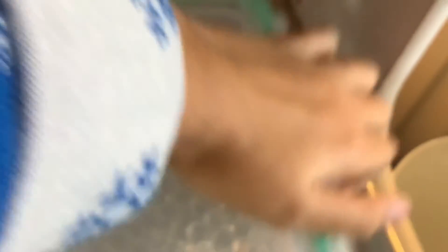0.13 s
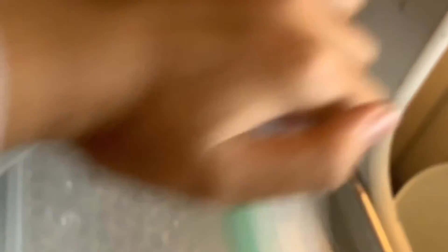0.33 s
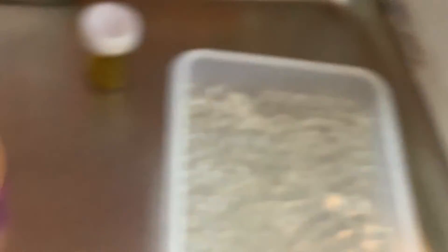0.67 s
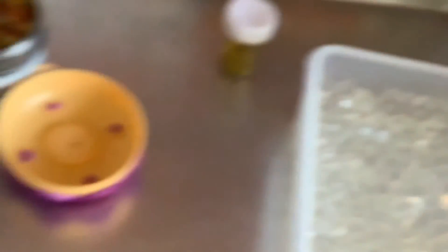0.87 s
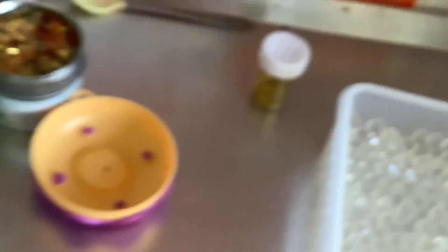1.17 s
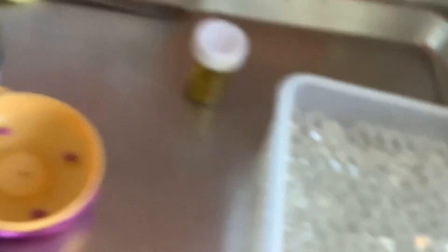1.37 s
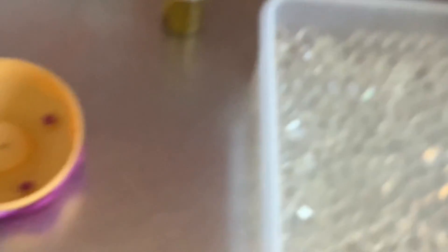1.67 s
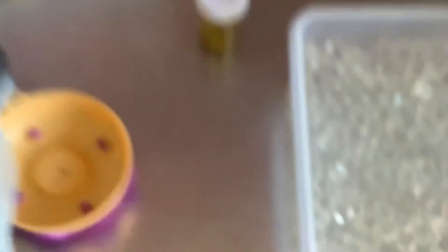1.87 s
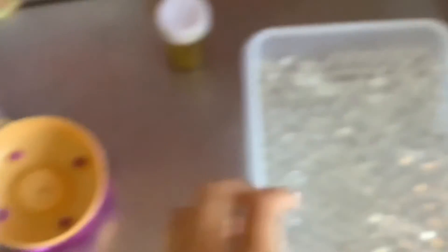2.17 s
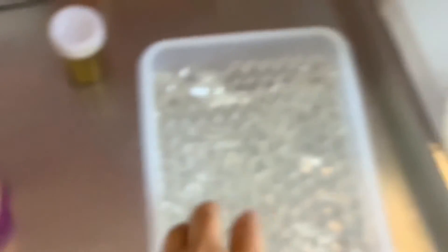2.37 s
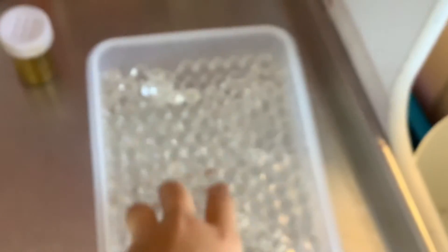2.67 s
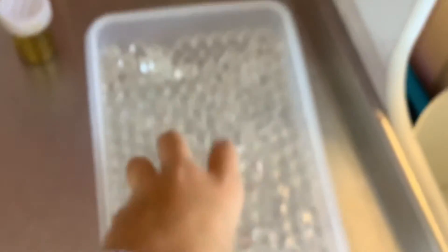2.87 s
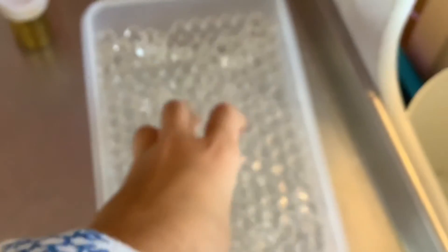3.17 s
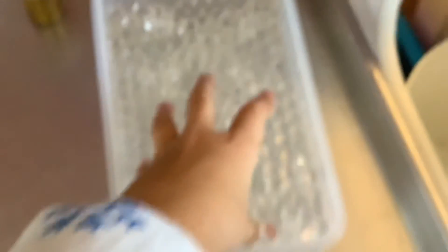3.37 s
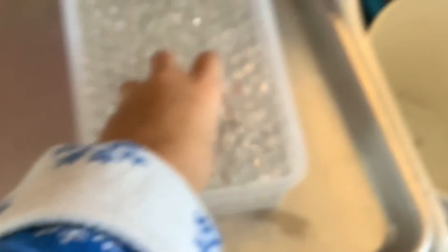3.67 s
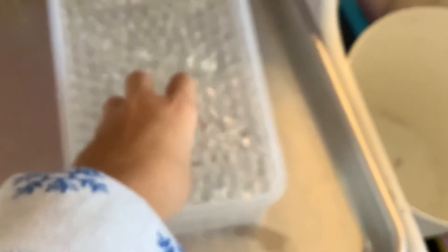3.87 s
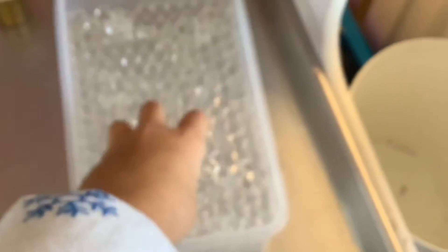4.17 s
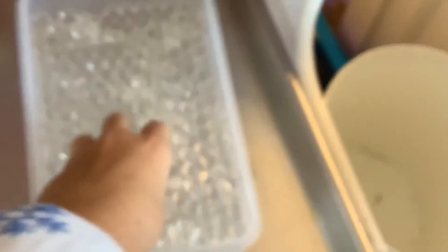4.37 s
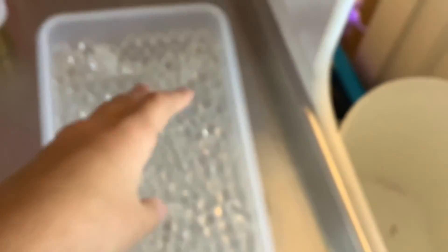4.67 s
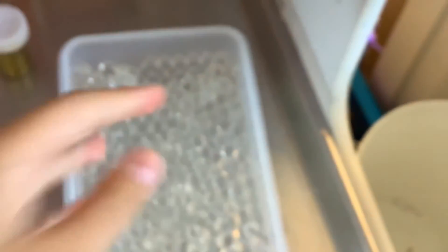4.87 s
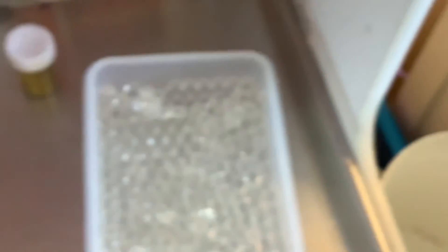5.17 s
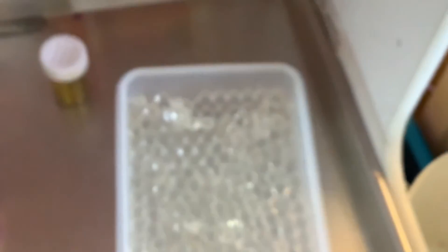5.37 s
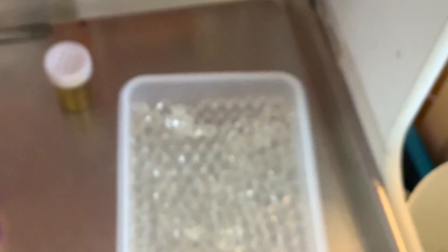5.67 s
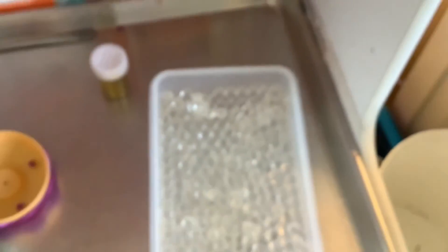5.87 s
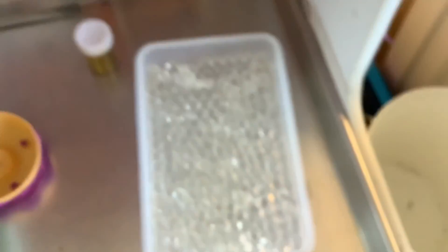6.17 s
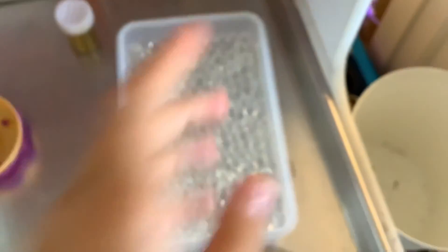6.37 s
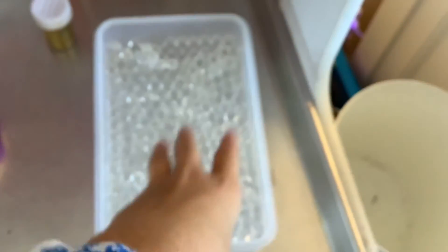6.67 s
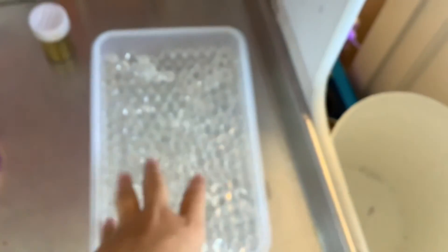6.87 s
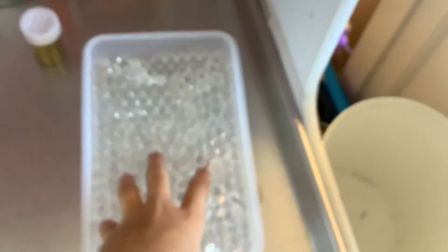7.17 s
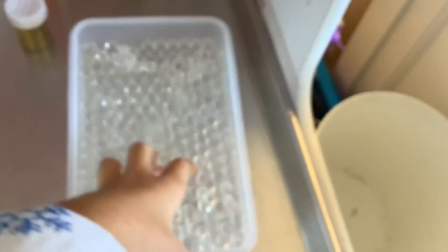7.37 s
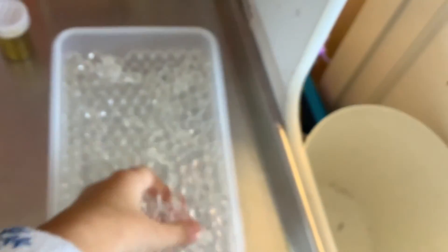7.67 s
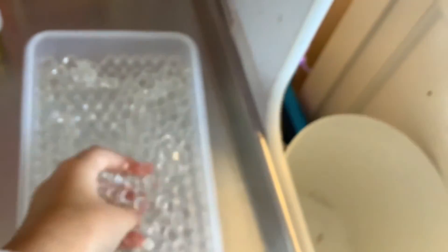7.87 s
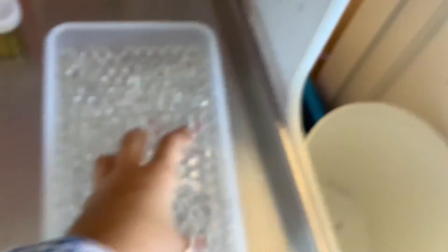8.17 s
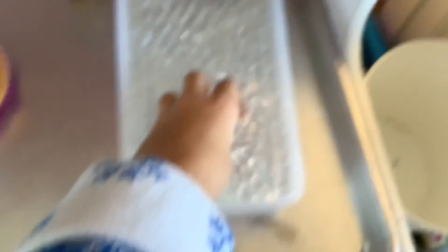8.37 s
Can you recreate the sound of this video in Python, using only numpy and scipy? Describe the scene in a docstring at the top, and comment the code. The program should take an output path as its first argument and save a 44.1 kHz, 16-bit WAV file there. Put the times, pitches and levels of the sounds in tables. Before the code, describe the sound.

Hollow plastic knocks and a sharp clatter on metal give way to quiet, low rubbery bead murmurs, wet clicks and a few dull handling thumps.

```python
"""Fingers press into a tub of wet gel beads, which rub with a low rubbery murmur, soft pats and wet clicks.
Before that a hand shoves a lidded plastic tub over a steel counter and light plastic clatters down.
Blows ring decaying modes, friction shapes random impulses, and single beads ring as rising sines.
Fingers bump the handheld phone with short falling chirps; a sleeve, the skin and the case add filtered rubs.
The camera ticks faintly once a frame over the hiss and rumble of a small quiet room."""
import sys
import numpy as np
from scipy import signal
from scipy.fft import rfft, irfft
from scipy.io import wavfile
from scipy.ndimage import uniform_filter1d

SR = 44100
rng = np.random.default_rng(int(sys.argv[2]) if len(sys.argv) > 2 else 0)


def transcribe(u):
    """Save the signal u as a 16-bit wav file named by the first command-line argument.

    u: samples, shape (n,) or (channels, n), limited to [-1, 1]; the rate is SR.
    q: integer samples, one column per channel.
    """
    v = np.clip(np.atleast_2d(u).T, -1, 1)
    q = np.round(v * 32767).astype(np.int16)
    wavfile.write(sys.argv[1], SR, q)


N = 375732
TIME = np.arange(N) / SR
HIT_SIZE = 16384  # longest single hit, in samples
AGE = TIME[:HIT_SIZE]  # seconds since the start of a hit

# snap of plastic on a hard surface: f/Hz, level/dB
CRACK = [(60, -20), (150, 4), (450, 8.5), (700, 3), (1400, 4), (2400, 3), (3000, -0.5), (5400, -7.5),
         (6500, -12), (9500, -12.5), (13000, -16), (16000, -17.5)]
# colour of skin on the phone: f/Hz, level/dB
SKIN_COLOUR = [(100, -8.5), (500, 6.5), (1000, -5), (1700, -4), (2600, -15.5), (6000, -20.5), (16000, -29)]


def undb(db):
    """Decibels to gain."""
    return 10 ** (np.asarray(db) / 20)


def unit(x):
    """Scale to rms 1."""
    return x / np.sqrt(np.mean(x ** 2))


def burst(x):
    """Scale a hit so that its loudest 8 ms have rms 1."""
    return x / np.sqrt(uniform_filter1d(x ** 2, size=353).max())


def fade(t60):
    """Exponential decay by 60 dB in t60 seconds, over the length of one hit."""
    return np.exp(-np.log(1000) * AGE / t60)


def add(track, s, x):
    """Mix x into the track from time s."""
    i = max(int(s * SR), 0)
    track[i:i + len(x)] += x[:max(N - i, 0)]


def band(x, lo_hz, hi_hz):
    """Causal band-pass."""
    edges_hz = [lo_hz, min(hi_hz, SR / 2 - 1)]
    return signal.sosfilt(signal.butter(2, edges_hz, "band", fs=SR, output="sos"), x)


def colour(x, points):
    """Causal filter through (f/Hz, level/dB) points, from the cepstrum of its log gain."""
    size = 4096
    hz, db = np.transpose(points)
    grid_hz = np.arange(size // 2 + 1) * SR / size
    gain_db = np.interp(np.log(grid_hz + 1), np.log(hz), db)
    cepstrum = irfft(np.log(undb(gain_db)))
    # folding the cepstrum forward gives minimum phase
    cepstrum[1:size // 2] *= 2
    cepstrum[size // 2 + 1:] = 0
    impulse = irfft(np.exp(rfft(cepstrum)))
    return signal.fftconvolve(x, impulse)[:len(x)]


def ring(modes, scatter_db=0, detune=0):
    """Decaying modes; each point of contact weights and detunes them a little."""
    out = np.zeros(HIT_SIZE)
    for hz, db, t60 in modes:
        weight, shift = rng.standard_normal(2)
        tone = np.sin(2 * np.pi * hz * (1 + detune * shift) * AGE)
        out += undb(db + scatter_db * weight) * fade(t60) * tone
    return out


def walk(rate):
    """Smooth random drift of rms 1, with about `rate` new values a second."""
    k = int(SR / rate)
    steps = np.repeat(rng.standard_normal(N // k + 1), k)
    return unit(uniform_filter1d(steps, k)[:N])


def clicks(per_s, spread_db):
    """Random impulses of either sign: many small, a few large."""
    size = undb(spread_db * np.minimum(rng.exponential(size=N), 4))
    return (rng.random(N) < per_s / SR) * size * rng.choice([-1, 1], N)


def weigh(x, edges_hz, low_db, high_db):
    """The place and hardness of a blow set how much goes into lows and highs beside the mids."""
    low, mid, high = (burst(band(x, lo, hi)) for lo, hi in zip(edges_hz, edges_hz[1:]))
    return undb(low_db) * low + mid + undb(high_db) * high


def disperse(x, cycles):
    """Bending waves run faster when higher: each frequency arrives about `cycles` of its own periods late."""
    hz = np.arange(HIT_SIZE + 1) * SR / (2 * HIT_SIZE)
    delay = np.exp(-2j * np.pi * cycles * np.log(hz + 20))
    return irfft(rfft(x, 2 * HIT_SIZE) * delay)[:HIT_SIZE]


def held(rows, attack_s, release_s):
    """Friction contacts: each builds up, holds while the movement lasts and dies away."""
    out = np.zeros(N)
    for s, length, db in rows:
        attack = np.clip((TIME - s) / attack_s, 0, 1)
        release = np.exp(-np.maximum(TIME - s - length, 0) / release_s)
        out += undb(db) * attack * release
    return out


def swell(s, build_s, ease_s):
    """Pressure grows to a peak at time s and eases off."""
    return np.exp(-np.maximum((s - TIME) / build_s, (TIME - s) / ease_s))


def blows(table, modes, note_db, note_t60, crack_db, crack_t60, buzz_db, buzz_t60, contact_s, dispersion):
    """Struck plastic: its modes, the note of the wall hit, a short crack and the buzz of many small modes."""
    out = np.zeros(N)
    contact = 1 - np.exp(-AGE / contact_s)  # contact time softens the onset
    for s, db, thud_db, high_db, note_hz in table:
        body = burst(ring(modes, scatter_db=2.5, detune=0.03))
        note = ring([(note_hz, note_db, note_t60)])
        snap = rng.standard_normal(HIT_SIZE) * (fade(crack_t60) + undb(buzz_db) * fade(buzz_t60))
        hit = body + note + undb(crack_db) * burst(colour(snap, CRACK))
        spread = disperse(contact * hit, dispersion)
        add(out, s, undb(db) * weigh(spread, (100, 400, 2000, 18000), thud_db, high_db))
    return out


def air():
    """Low room rumble and microphone hiss: coloured noise whose level drifts slightly."""
    # still room: f/Hz, level/dB
    air_colour = [(15, -41), (25, -9), (55, 2.5), (133, 2.5), (246, -8), (445, -9.5), (1140, -25),
                  (1900, -26.5), (2630, -23.5), (3440, -30), (5010, -27.5), (5430, -23), (6380, -30.5),
                  (10100, -25), (15500, -28)]
    hiss = colour(rng.standard_normal(N), air_colour)
    hiss = signal.sosfilt(signal.butter(6, 46, "high", fs=SR, output="sos"), hiss)
    return undb(-66 + 0.25 * walk(2.1)) * unit(hiss)


def tub():
    """The tub knocks and judders along the counter; stick and slip drive the same modes."""
    # tub knocks: t/s, mid-band level/dB, thud re mids/dB, crack re mids/dB, wall note f/Hz
    knocks = [(0.019, -48.5, 3.5, -1.5, 585), (0.1, -28.5, 2.5, -6, 650), (0.166, -36.5, -27, -17, 680),
              (0.247, -26, -12, -12, 676), (0.267, -33.5, 6.5, -13, 630), (0.297, -20, -5.5, -23, 670),
              (0.347, -31.5, -1.5, -13.5, 770), (0.396, -26, 5.5, -14, 680), (0.521, -28, -0.5, -2, 894),
              (0.54, -26, 0, -24, 646), (0.629, -47.5, -5, 5, 1130), (0.655, -59, 4, 0.5, 540),
              (0.755, -57.5, 2, 3.5, 540), (0.849, -56.5, -5, -5, 635), (0.936, -45.5, -4.5, -4.5, 843)]
    # ringing of the full tub: f/Hz, level/dB, t60/s
    tub_modes = [(128, -8.5, 0.08), (160.7, -3, 0.066), (190.5, -5.5, 0.064), (265.3, -5, 0.041),
                 (350, -2, 0.036), (425.2, -4.5, 0.036), (576, -1.5, 0.039), (668, -4.5, 0.027),
                 (772, -7, .035), (914, -4, 0.037), (1119, -5, 0.026), (1282, -1, 0.024), (1585, -17, .014),
                 (1890, -17, 0.028), (2310, -14.5, 0.022), (3700, -11, 0.021), (4530, -8.5, .012)]
    # slides over the counter: start t/s, length/s, level/dB
    slides = [(0, 0.064, -54), (.115, 0.043, -45.5), (.2, 0.054, -54), (.245, 0.166, -50.5),
              (.4, 0.32, -63)]
    struck = blows(knocks, tub_modes, note_db=10.5, note_t60=0.013, crack_db=-1.5, crack_t60=0.0091,
                   buzz_db=-29.5, buzz_t60=0.081, contact_s=0.005, dispersion=0.497)
    grip = clicks(per_s=450, spread_db=0.5)
    judder = unit(signal.fftconvolve(grip, ring(tub_modes))[:N])
    judder += undb(-8) * unit(colour(grip, CRACK))
    return struck + held(slides, attack_s=0.012, release_s=0.012) * judder


def camera():
    """The camera mechanism ticks once a frame, each tick ringing small high modes at its own strength."""
    frame_hz, first_frame_s = 29.985, 0.0205
    # camera tick: f/Hz, level/dB, t60/s
    tick_modes = [(2520, -4, 0.01), (4040, -6.5, .006), (5470, -1, 0.006), (5950, -9.5, 0.0084),
                  (7170, -10, 0.009)]
    strikes = np.zeros(N)
    frames = (np.arange(first_frame_s, TIME[-1], 1 / frame_hz) * SR).astype(int)
    strikes[frames] = undb(2.0 * rng.standard_normal(len(frames)))
    return undb(-79.5) * unit(signal.fftconvolve(strikes, ring(tick_modes))[:N])


def groans(waver=0.03):
    """Plastic sticks and slips regularly: a nearly pure, unsteady tone with a weak octave."""
    # groans: t/s, length/s, pitch f/Hz, level/dB
    groan_rows = [(0.153, 0.024, 603, -37), (1.365, 0.11, 305.7, -54)]
    out = np.zeros(N)
    for s, length, hz, db in groan_rows:
        size = int(length * SR)
        phase = 2 * np.pi * hz * np.cumsum(1 + waver * walk(90)[:size]) / SR
        tone = np.sin(phase) + undb(-17.5) * np.sin(2 * phase)
        add(out, s, undb(db) * unit(tone * signal.windows.tukey(size, 0.5)))
    return out


def clatter():
    """Light plastic lands and rocks to rest in a run of ringing blows."""
    # plastic on the counter: t/s, mid-band level/dB, thud re mids/dB, crack re mids/dB, wall note f/Hz
    landings = [(1.36, -45, -4, 0, 893), (1.438, -50, 3, -11.5, 1080), (1.508, -12.5, -8, -3, 1302),
                (1.532, -24, -2, -3, 930), (1.563, -30.5, -11, 2, 1640), (1.575, -32.5, -6, 8.5, 1820),
                (1.632, -23.5, -5.5, 0, 755), (1.676, -24, -6.5, 2, 2270), (1.693, -24, -5, -1.5, 990),
                (1.712, -33.5, -3.5, -18, 1110), (1.771, -33, 0, -6, 985), (1.786, -26, -2, -0.5, 1080),
                (1.882, -36.5, -3.5, -11.5, 750), (1.966, -40, -2, -2.5, 2087)]
    # ringing of the light plastic: f/Hz, level/dB, t60/s
    plastic_modes = [(114, -14.5, .09), (194.2, -8.5, 0.082), (288.2, -6, 0.07), (400, -6, .04),
                     (510, -8.5, 0.044), (530, -11, 0.099), (574, -10, .06), (762, -10, 0.019),
                     (920, -9.5, .025), (1044, -2, 0.0083), (1244, -6.5, .025), (1380, -5, .022),
                     (1666, -6, 0.032), (2215, 2.5, 0.022)]
    return blows(landings, plastic_modes, note_db=0, note_t60=0.023, crack_db=-3.5, crack_t60=0.022,
                 buzz_db=-21.5, buzz_t60=0.08, contact_s=0.00097, dispersion=2.5)


def bead_pats(pitch_hz=140, swell_s=0.005):
    """The jelly-like mass gives way under the hand with a soft, damped bounce and a faint squish."""
    # pats or pushes on the beads: t/s, level/dB
    pats = [(2.393, -36.5), (2.902, -38), (3.602, -45), (4.203, -42.5), (4.271, -41.5), (4.561, -47),
            (6.843, -38.5), (7.513, -46.5), (8.373, -40), (8.418, -43.5)]
    out = np.zeros(N)
    for s, db in pats:
        hz = pitch_hz * rng.uniform(0.88, 1.12)
        bounce = AGE * np.exp(-AGE / swell_s) * np.sin(2 * np.pi * hz * AGE)
        squish = band(rng.standard_normal(HIT_SIZE), 230, 2100) * fade(0.095)
        add(out, s, undb(db) * (burst(bounce) + undb(-30.5) * burst(squish)))
    return out


def bead_rubbing():
    """Soft beads stick and slip and shake the tub; their wet film crackles in short pitched grains."""
    # finger pushes: peak t/s, build-up/s, easing/s, level/dB, wet crackle re push/dB
    strokes = [(2.405, .008, 0.014, -41, -12), (2.63, 0.15, .08, -48.5, -19),
               (2.95, 0.07, 0.078, -40, -19.5), (3.161, 0.05, 0.14, -46.5, -37),
               (3.65, 0.086, 0.053, -38, -12), (3.78, 0.042, 0.11, -47, -19),
               (3.98, 0.028, 0.13, -46.5, -32), (4.29, 0.053, 0.052, -41, -24),
               (4.46, 0.019, .035, -49.5, -25.5), (4.57, 0.049, 0.048, -48, -36),
               (7.14, .12, 0.056, -52.5, -27), (7.41, 0.21, 0.078, -47.5, -25),
               (7.53, 0.051, 0.072, -42, -33), (7.68, 0.061, .1, -49, -21.5), (7.9, 0.061, 0.063, -47, -32),
               (8.1, 0.18, 0.099, -43.5, -33.5), (8.43, 0.16, 0.13, -45.5, -17.5)]
    # mass of beads in its tub: f/Hz, level/dB
    bead_body = [(40, -35), (70, -11), (105, 7.5), (150, 3.5), (190, -0.5), (240, -13.5), (330, -23),
                 (700, -31), (1500, -52.5)]
    # wet film between the beads: f/Hz, level/dB
    film = [(120, -21.5), (260, 12.5), (400, 2), (750, 3), (1400, -5.5), (2300, -6.5), (4000, -10.5),
            (7000, -19.5), (11000, -21.5), (16000, -18.5)]
    push_power, wet_power = np.zeros(N), np.zeros(N)
    for s, build, ease, db, wet_db in strokes:
        force = undb(db) * swell(s, build, ease)
        push_power += force ** 2
        wet_power += (force * undb(wet_db)) ** 2
    murmur = unit(colour(clicks(per_s=240, spread_db=0.0), bead_body))
    crackle = np.zeros(N)
    for hz in np.geomspace(230, 14000, num=44):
        grain = fade(min(24 / hz, 0.02)) * np.sin(2 * np.pi * hz * AGE)
        grains = signal.oaconvolve(clicks(per_s=33, spread_db=3.5), grain[:HIT_SIZE // 8])[:N]
        crackle += np.sqrt(hz) * unit(grains)
    return np.sqrt(push_power) * murmur + np.sqrt(wet_power) * unit(colour(crackle, film))


def bead_slips(pocket_t60=0.017, rise=3, swell_s=0.0019):
    """A bead squirts free: the film snaps and a tiny air pocket rings, rising in pitch."""
    # wet clicks of single beads: t/s, level/dB, starting pitch f/Hz
    slips = [(2.84, -65.5, 930), (2.9144, -55.5, 1630), (2.931, -57, 5200), (2.9886, -62.5, 4500),
             (3.042, -62, 2130), (3.17, -61.5, 8060), (3.5413, -56.5, 2930), (3.5564, -59, 4140),
             (3.6002, -50, 1320), (3.625, -59, 1660), (3.6532, -58, 1510), (3.704, -56.5, 2090),
             (3.7177, -52.5, 2204), (4.2327, -52, 10600), (4.2649, -57, 1460), (7.481, -57, 4124),
             (7.498, -56, 3630), (7.5348, -62.5, 5000), (7.561, -63, 1290), (7.8498, -59, 9770),
             (8.0373, -60, 2920), (8.0828, -61.5, 1066), (8.113, -60.5, 4000), (8.276, -63.5, 1470),
             (8.3688, -57.5, 4670), (8.371, -57.5, 1410)]
    out = np.zeros(N)
    opening = 1 - np.exp(-AGE / swell_s)
    for s, db, hz in slips:
        phase = 2 * np.pi * hz * AGE * (1 + rise * AGE)
        pocket = fade(pocket_t60) * np.sin(phase) * opening
        snap = band(rng.standard_normal(HIT_SIZE), hz / 2, hz * 2) * fade(0.041) * opening
        add(out, s, undb(db) * (burst(pocket) + burst(snap)))
    return out


def phone_taps(dispersion=0.812, note_t60=0.016):
    """Each bump crosses the case as a pulse that falls in pitch; the case clicks and the fingertip scuffs."""
    # finger bumps: t/s, mid-band level/dB, boom re mids/dB, tick re mids/dB, case note f/Hz, note level/dB
    taps = [(5.312, -43.5, 5, -8.5, 2680, -11), (5.327, -46.5, -5, -8, 1690, -17),
            (5.616, -4.5, -4.5, -17, 1600, -12.5), (5.935, -36, -18, -0.5, 1520, -29),
            (5.938, -28.5, -3.5, -5.5, 2290, -9), (5.963, -32.5, -2, -13.5, 1680, -16),
            (5.997, -25, -4.5, -11.5, 2370, -11), (6.04, -22.5, -9.5, -7.5, 2210, -12),
            (6.116, -40.5, -3, -7, 1600, -6), (6.167, -26.5, -16, -6, 1660, -5)]
    # response of the phone body: f/Hz, level/dB
    phone_body = [(25, -17), (45, -7.5), (62, -1), (100, 0), (150, 4), (280, 3), (400, -3.5), (600, -7),
                  (1200, -16), (2400, -25.5), (4500, -43), (7500, -58.5), (16000, -71)]
    # faint ring of the phone: f/Hz, level/dB, t60/s
    phone_modes = [(537, -19.5, 0.087)]
    pulse = colour(signal.unit_impulse(HIT_SIZE), phone_body)
    chirp = burst(disperse(pulse, dispersion))
    out = np.zeros(N)
    for s, db, boom_db, tick_db, note_hz, note_db in taps:
        rub = colour(rng.standard_normal(HIT_SIZE) * fade(0.018), SKIN_COLOUR)
        scuff = burst(band(rub, 100, 3900))
        case = ring(phone_modes + [(note_hz, note_db, note_t60)])
        hit = chirp + undb(-21.5) * scuff + case
        add(out, s, undb(db) * weigh(hit, (35, 150, 1500, 16000), boom_db, tick_db))
    return out


def case_flexes():
    """The case flexes under the grip with a deep rumble of narrow-band noise."""
    # flexes: start t/s, length/s, level/dB
    flexes = [(5.315, 0.016, -59.5), (5.62, .06, -63.5), (5.94, .1, -67), (8.16, 0.067, -50),
              (8.28, .24, -61.5)]
    rumble = unit(band(rng.standard_normal(N), 52, 80))
    return held(flexes, attack_s=0.02, release_s=0.038) * rumble


def skin_drags():
    """Skin drags on the phone as the grip shifts: dense random impulses, coloured dull."""
    # drags: start t/s, length/s, level/dB
    drags = [(5.355, 0.039, -60.5), (5.595, 0.021, -45), (5.735, 0.13, -55.5), (5.94, 0.17, -59.5),
             (6.15, 0.0097, -45)]
    skin = unit(colour(clicks(per_s=4200, spread_db=4.5), SKIN_COLOUR))
    return held(drags, attack_s=0.018, release_s=0.012) * skin


def sleeve_brushes():
    """The sleeve brushes along the tub; its cloth rustles softly and unevenly."""
    # brushes: start t/s, length/s, mean level/dB
    brushes = [(7.12, 0.046, -64.5), (7.2, 0.27, -65.5), (8.36, 0.19, -70.5)]
    # colour of the cloth: f/Hz, level/dB
    cloth = [(150, -16), (650, -1.5), (880, 4), (1100, -4), (1300, 0.5), (1800, -6.5), (2600, -12),
             (4000, -10.5), (6000, -18), (16000, -17.5)]
    sleeve = unit(colour(clicks(per_s=930, spread_db=3.0), cloth)) * undb(2 * walk(51))
    return held(brushes, attack_s=0.0083, release_s=0.025) * sleeve


def room(x, low_t60=0.24, high_t60=0.24):
    """A short diffuse tail that builds up over the first milliseconds."""
    low, high = rng.standard_normal((2, HIT_SIZE))
    tail = band(low, 90, 2500) * fade(low_t60)
    tail += undb(-4.5) * band(high, 3200, 9900) * fade(high_t60)
    tail *= 1 - np.exp(-AGE / 0.0028)
    return signal.fftconvolve(x, tail / np.sqrt(np.sum(tail ** 2)))[:N]


def scene():
    """Plastic and beads reach the room; the phone's own sounds and the sleeve stay dry."""
    shove = tub() + groans()
    rattle = clatter()
    beads = bead_pats() + bead_rubbing() + bead_slips()
    echo = room(undb(-18.5) * shove + undb(-16) * rattle + undb(-18.5) * beads)
    handling = phone_taps() + case_flexes() + skin_drags() + sleeve_brushes()
    return (shove + rattle + beads + echo + handling + camera() + air())[None]


def record(dry):
    """The phone drops the deepest bass, clips at full scale and cuts the top."""
    bass_hz, top_hz = 30, 15800
    x = signal.sosfilt(signal.butter(2, bass_hz, "high", fs=SR, output="sos"), dry)
    top_cut = signal.ellip(8, 0.2, 70, top_hz, fs=SR, output="sos")
    return signal.sosfilt(top_cut, np.clip(x, -1, 1))


dry = scene()
out = record(dry)
transcribe(out)
```